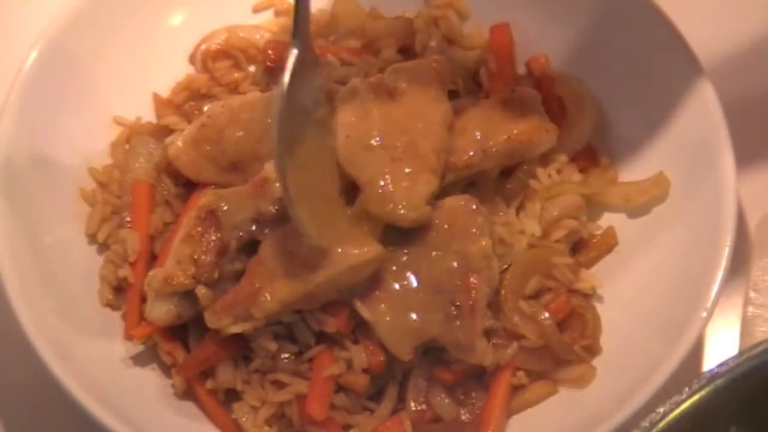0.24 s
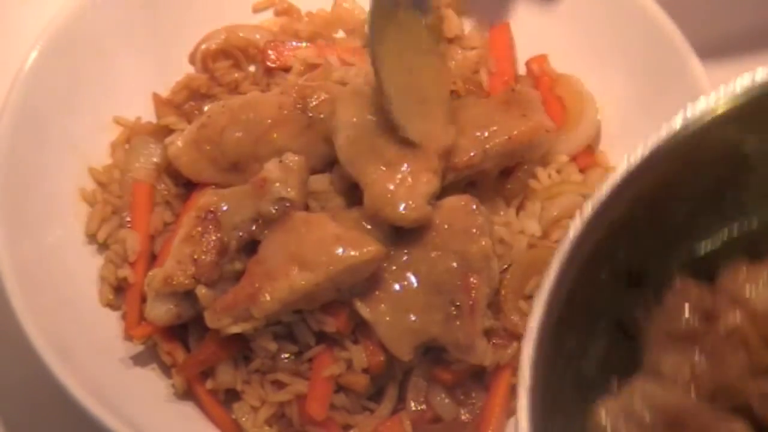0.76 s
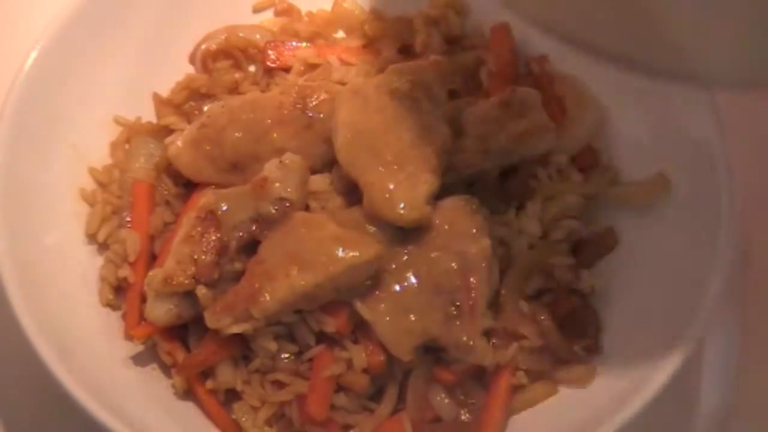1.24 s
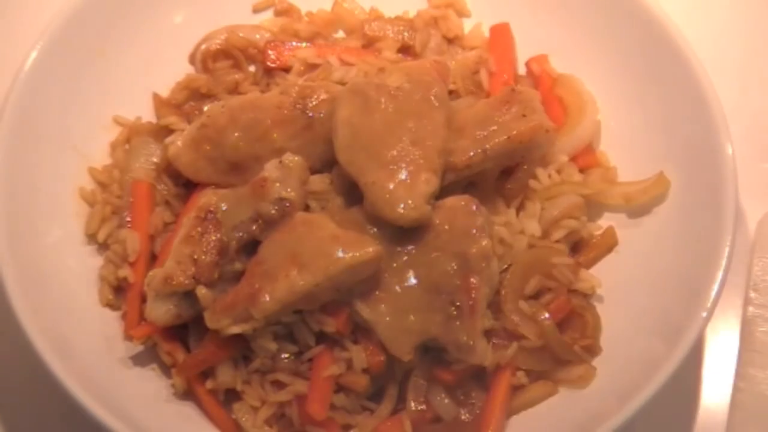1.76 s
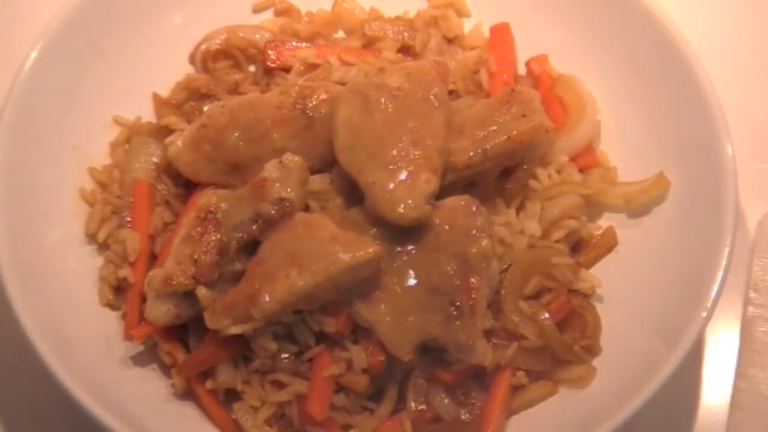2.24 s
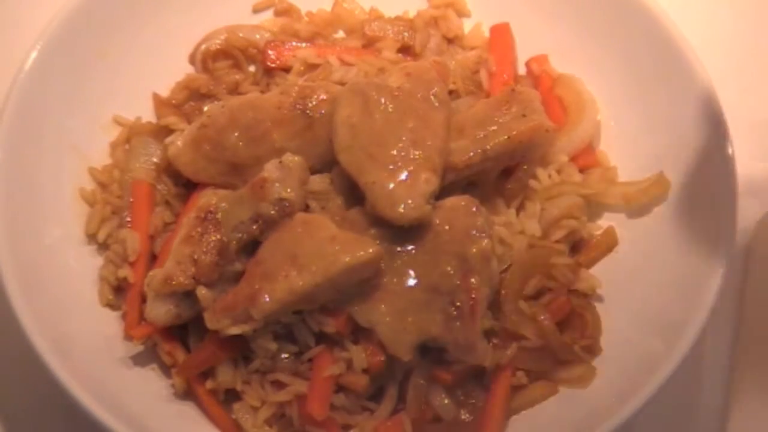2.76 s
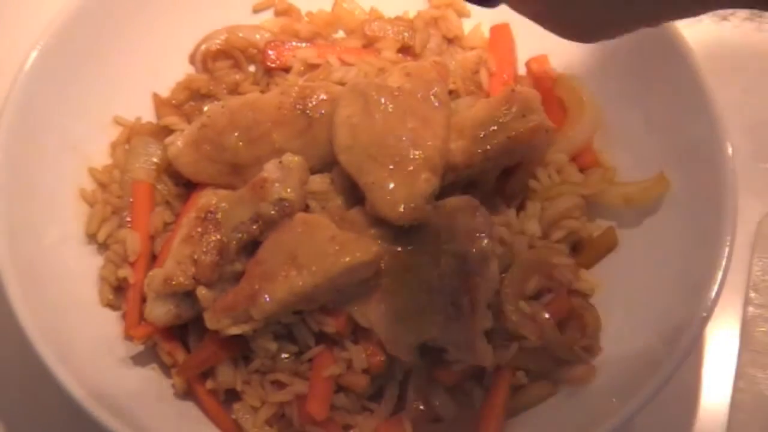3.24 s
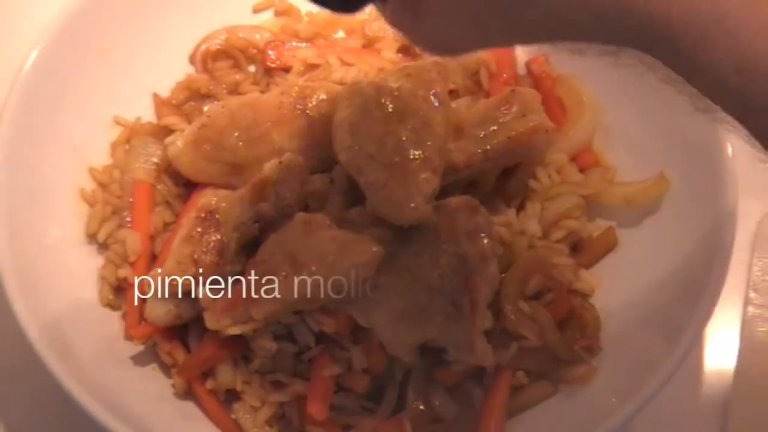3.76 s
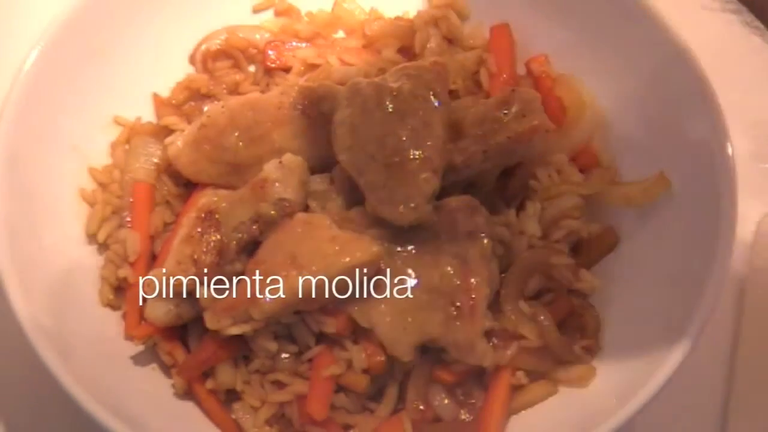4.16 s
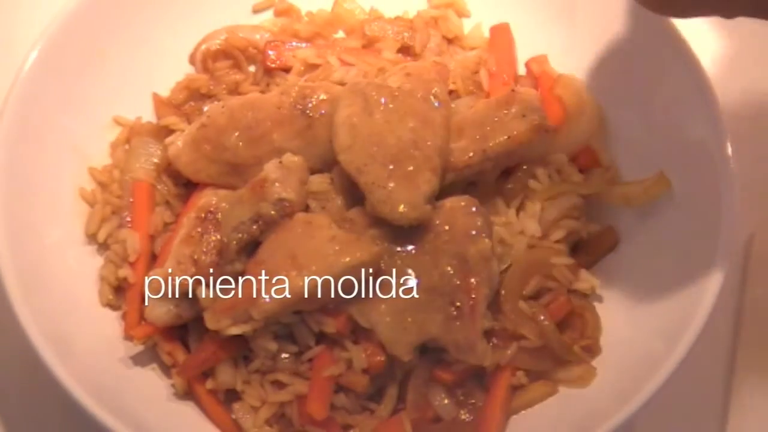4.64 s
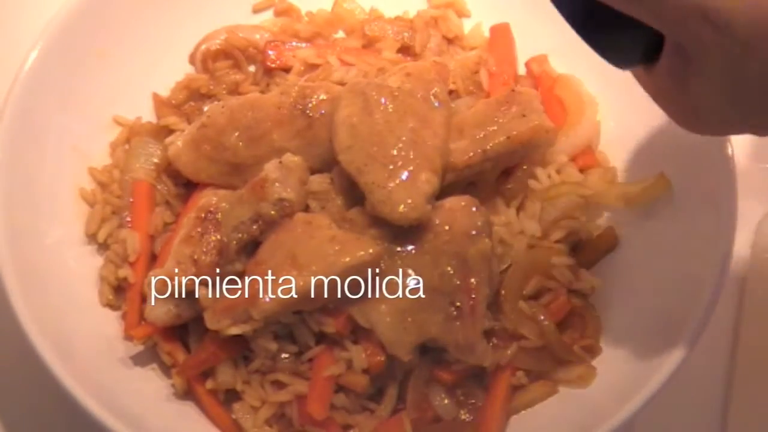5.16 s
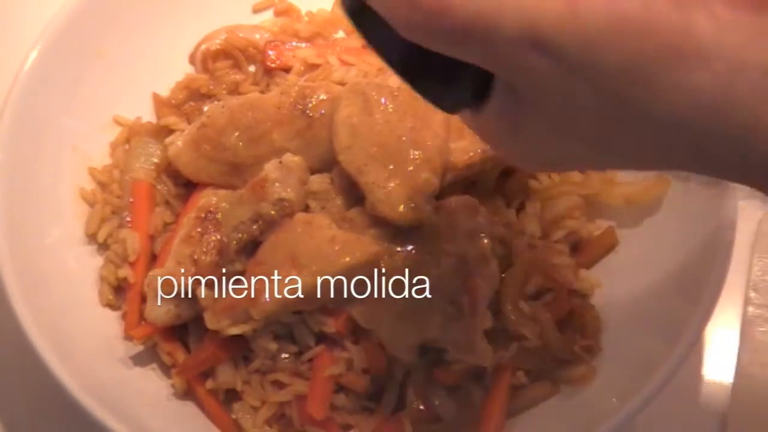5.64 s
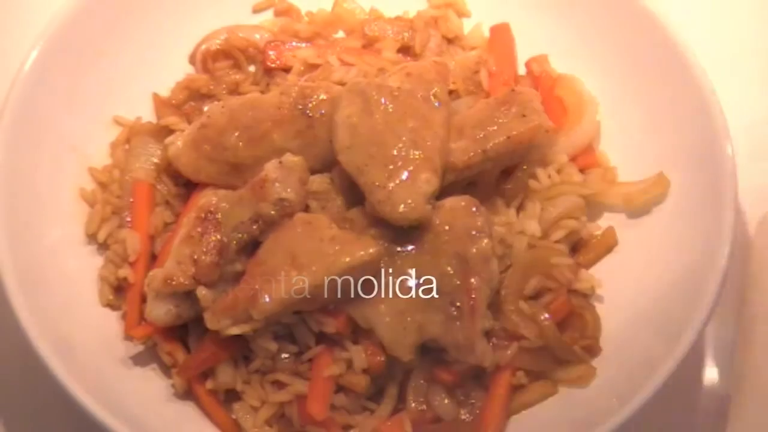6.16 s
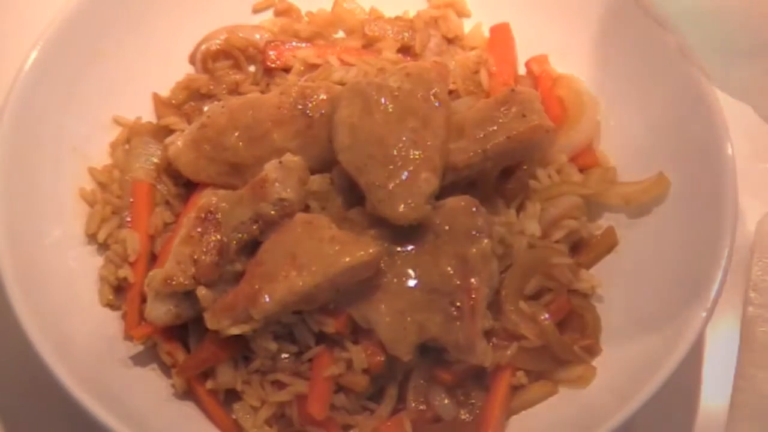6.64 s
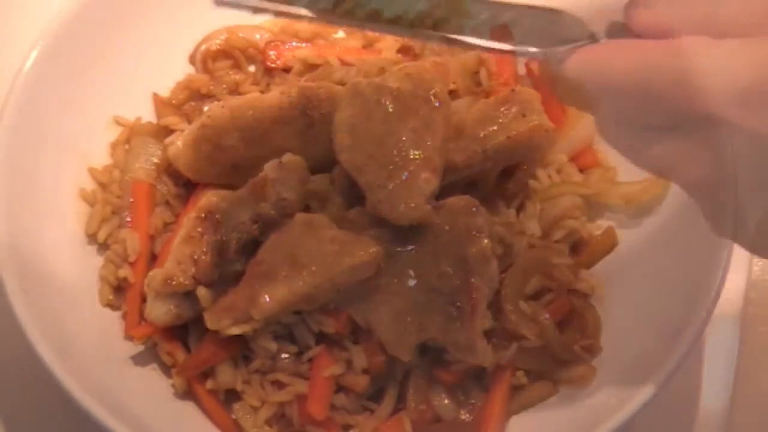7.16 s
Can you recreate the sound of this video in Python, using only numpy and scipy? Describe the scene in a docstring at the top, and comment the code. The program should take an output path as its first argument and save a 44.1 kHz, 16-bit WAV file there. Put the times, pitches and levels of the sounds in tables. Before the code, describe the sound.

A pan and lid knock sharply in a humming kitchen, a glass pepper mill grinds in short crunchy turns, and a metal grater rasps briefly.

```python
"""A glass pepper mill is twisted in short crunching turns: rough noise and single cracks ring its body,
while loose peppercorns tick on the glass jar as short rings of sliding pitch. Before that come a rustle
and the knocks of a cupboard, a pan, a lid and a spoon, each a push that clatters and rings; at the end,
short strokes on a steel grater, made of shaped rough noise. A hard-walled kitchen answers with fading
noise, and behind it all lie air noise and the wavering tones of appliances."""
import sys
import numpy as np
from scipy import signal
from scipy.fft import rfft, irfft, next_fast_len
from scipy.io import wavfile
from scipy.ndimage import uniform_filter1d, map_coordinates

SR = 44100
rng = np.random.default_rng(int(sys.argv[2]) if len(sys.argv) > 2 else 0)


def gain_from_decibels(decibels):
    """Convert decibel values to linear amplitude factors."""
    exponent = np.asarray(decibels, float) / 20
    return 10 ** exponent


def bounce(signal):
    """Save signal as a 16-bit WAV file at the path given by the first command-line argument."""
    frames = np.transpose(np.atleast_2d(signal))
    limited = np.clip(frames, -1, 1)
    pcm = np.round(limited * 32767).astype(np.int16)
    wavfile.write(sys.argv[1], SR, pcm)


N = 325899
T = np.arange(N) / SR  # time of each sample, in seconds

# How the background rises and falls: (time [s], change [dB])
BACKGROUND_SWELL = [(0, 0), (.9, 0), (1.55, -0.5), (1.92, 0.5), (2.4, 2), (3.3, 2.5), (6, 2.5), (6.5, 1.17),
                    (6.95, 0.4), (7.39, 2)]
# Colour of the air's low rush: (frequency [Hz], relative level [dB])
RUSH_COLOUR = [(25, -42), (60, -22), (90, -20), (170, -13), (240, -6), (295, -8), (330, 0), (700, -1),
               (880, -5), (1000, -2), (1650, -8), (2100, -16), (2700, -28), (3600, -50)]
# Colour of the air's hiss: (frequency [Hz], relative level [dB])
HISS_COLOUR = [(1500, -30), (2300, -2), (3000, 0), (5000, -2), (6300, -1), (8200, -3), (10000, -10),
               (14000, -17), (15200, -22), (16000, -40)]
# How alike the room noise is on the left and right: (frequency [Hz], likeness [-1 to 1])
ROOM_LIKENESS = [(60, -0.14), (180, 0.66), (550, -0.077), (1650, 0.4), (4970, 0.3), (15000, 0.07)]
# High appliance whine, before its drops: (frequency [Hz], level [dB])
WHINE_TONES = [(3752, -79), (4140, -89), (5701, -88), (6040, -89), (6433, -88), (7278, -90), (8037, -90)]
# Where the whine steps down: (time [s], loss [dB])
WHINE_DROPS = [(1.0, 3.5), (1.75, 11)]
# Low appliance drone: (frequency [Hz], relative level [dB])
DRONE_TONES = [(166.9, -91.5), (199.2, -76.5), (333.8, -73.5), (430.7, -76.5), (473.7, -71), (597.5, -86)]
# Motor tones that do not follow the swell: (frequency [Hz], level [dB])
MOTOR_TONES = [(60, -102.5), (101, -86), (334, -82), (1410, -79.5), (1637, -75)]

# How long the kitchen rings on: (frequency [Hz], time to fall 60 dB [s])
KITCHEN_DECAY = [(150, 0.66), (1000, 0.71), (4000, 0.47), (9000, 0.49), (15000, 0.19)]
# How alike the echoes are on the left and right: (frequency [Hz], likeness [-1 to 1])
ECHO_LIKENESS = [(120, 0.1), (300, 1), (1000, 0.91), (5000, 0.86), (9000, 0.072), (13000, 0.73)]

# The rustle, one row: (start [s], rise [s], level [dB], fall [dB per s])
SLEEVE = (.985, .04, -64, 110)
# Colour of the rustling cloth: (frequency [Hz], relative level [dB])
CLOTH_COLOUR = [(1500, -33), (2500, 3), (4000, 0), (8000, 2), (12000, -11), (15000, -25)]

# Contacts of objects: (time [s], clatter peak [dB], object [name], rise [s], chatter's 60 dB fall [s])
CONTACTS = [(1.463, -51, "cupboard", 0.0087, 0.11), (1.637, -25, "spoon", 0.00069, 0.059),
            (1.669, -33.5, "spoon", 0.0038, 0.044), (1.864, -54, "pan", 0.047, 0.13),
            (1.936, -4, "pan", 0.00044, 0.02), (1.945, -17, "pan", 0.0025, 0.019),
            (2.069, -13, "lid", 0.0012, 0.086), (2.08, -18, "lid", 0.0092, 0.05),
            (2.253, -35, "lid", 0.0059, 0.12), (2.558, -25, "mill", 0.0015, 0.063),
            (2.573, -30, "mill", 0.01, 0.068), (3.424, -10, "burr", 0.00031, 0.016),
            (3.472, -13.5, "burr", 0.00014, 0.011)]
# What each object rings with, by name: (frequency [Hz], width [Hz], relative level [dB])
OBJECT_RINGS = {"cupboard": [(210, 23, -8.5), (340, 60, -9)], "spoon": [(705, 30, -2), (1250, 30, -3),
                (1740, 40, -9), (2350, 40, -8), (3690, 60, -9), (4830, 20, 2), (5500, 20, -3),
                (6150, 30, -5), (6740, 35, -1), (7940, 45, -7), (8490, 45, -8),
                (9770, 30, -13)] , "pan": [(890, 30, -19), (1132, 13, 9.5), (1260, 17, -9.5),
                (1605, 16, 0.5), (1830, 23, 8.5), (2240, 78, -14.5), (2480, 11, -12.5), (3370, 170, 5.5),
                (3315, 15, -4), (3460, 30, -16), (5000, 23, -25.5), (5140, 34, -21), (6100, 120, -1),
                (7000, 21, -10.5)], "lid": [(875, 20, -8), (2014, 12, 4), (2930, 50, -4), (3025, 35, -2),
                (4775, 12, -7), (5356, 25, -6), (5490, 25, -8), (5770, 30, -9), (6375, 26, -5),
                (7058, 24, -1), (7434, 40, -8), (8115, 30, -7), (8430, 40, -10),
                (9300, 50, -15)] , "mill": [(1384, 44, -2), (2200, 43, -4), (3340, 120, -7), (3700, 34, -2),
                (4580, 32, -25), (5680, 57, -1), (7130, 32, 3), (8000, 23, -15), (8100, 48, -5),
                (11800, 110, -23)], "burr": [(895, 26, 5), (2550, 190, -2), (3140, 280, -1.5),
                (4500, 180, -11.5), (7300, 250, -11)]}
# Broad colour of each object's clatter, by name: (frequency [Hz], relative level [dB])
CLATTER_COLOUR = {"cupboard": [(60, -29), (200, 13), (600, -8), (3300, -17), (6000, -54)],
                  "spoon": [(180, -63), (300, -38), (701, -9), (1430, -3.5), (1560, -18), (6960, -6),
                  (13300, -19.5), (16000, -79)], "pan": [(71, -51), (120, -23), (341, -13.5), (630, -4),
                  (1290, -1.5), (1550, -5), (1830, 3.5), (2590, -15), (3310, 2), (3900, -11), (6630, -14.5),
                  (11500, -35.5), (16000, -51)], "lid": [(120, -52), (200, -39.5), (883, -2.5), (1650, -12),
                  (1940, 6.5), (3020, -9), (4040, -12.5), (7140, -3.5), (16000, -28)], "mill": [(120, -46),
                  (200, -15.5), (968, -4), (1870, -10), (2130, -3.5), (4040, -11.5), (8270, -2),
                  (13100, -28), (16000, -13)], "burr": [(88, -56), (150, -17), (1020, -4.5), (1690, -5),
                  (4490, 0), (4860, -3.5), (7770, -4.5), (8230, -12), (16000, -24.5)]}
# Peak of each object's ring against its clatter, by name: level [dB]
RING_OVER_CLATTER = {"cupboard": -6, "spoon": -5.5, "pan": -8, "lid": -5.5, "mill": -4, "burr": -6.5}
# The worktop's jolt under the pan, one row: (time [s], peak [dB], length [s])
WORKTOP_JOLT = (1.9365, -44, 0.009)

# Grater strokes: (start [s], length [s], plate level [dB], teeth level [dB])
GRATER_STROKES = [(7.027, 0.003, -29, -48.5), (7.083, 0.074, -53, -42), (7.177, 0.029, -31.5, -42)]
# Colour of the shaking plate: (frequency [Hz], relative level [dB])
PLATE_COLOUR = [(60, -70), (130, -21.5), (330, -0.5), (510, -7), (700, -1), (1220, -2.5), (1370, 0),
                (1800, -6), (2300, -9.5), (3300, -21.5), (4500, -41), (7000, -70)]
# Colour of the hissing teeth: (frequency [Hz], relative level [dB])
TEETH_COLOUR = [(900, -55), (2200, 7.5), (3100, 2.5), (3450, 6.5), (5000, -0.5), (8200, 1), (11000, -11.5),
                (14000, -15), (16000, -47)]

# Spells of corns tumbling: (start [s], length [s], rattle level [dB], upper ring against it [dB])
TUMBLES = [(2.387, 0.15, -67.5, -8), (2.56, 0.27, -63.5, -7), (3.003, 0.11, -51, -1),
           (3.217, 0.041, -62.5, -22), (3.455, 0.14, -51.5, -6), (3.817, 0.21, -52.5, -7),
           (4.12, 0.16, -50.5, -5), (4.391, 0.26, -53, -2), (4.826, 0.15, -48, -1.5),
           (5.15, 0.14, -48.5, -1.5), (5.407, 0.26, -51, -5.5), (5.735, 0.2, -52.5, -2.5),
           (6.284, 0.01, -42, -20), (6.35, 0.12, -67.5, 4)]
# The loudest single corns on the glass: (time [s], strength [dB], upper ring against it [dB])
LOUD_TICKS = [(2.5599, -37, 4), (3.0093, -47, 8), (3.2567, -32, -0.5), (3.4236, -21, -12), (3.5406, -38, 3),
              (3.6272, -31, 8), (4.084, -46, 2), (4.2116, -47, 6), (4.2819, -28, 1), (4.4176, -44, 3),
              (4.4825, -41, 13), (4.732, -48, 8), (4.9946, -54, 15), (5.1939, -46, 3), (5.2423, -29, -2),
              (5.4164, -50, 18), (5.4672, -43, -4), (5.6089, -25, 1), (5.6573, -41, 6), (5.7376, -33, -2),
              (5.7855, -45, 5), (5.8617, -26, -7), (5.927, -49, 16), (6.2943, -26.5, -27),
              (6.317, -27, -22), (6.335, -31, -15), (6.3977, -32.5, -1)]

# Turns of the mill: (start [s], climb [s], level [dB], cap resonance [Hz], low thud against it [dB])
MILL_TURNS = [(2.953, 0.027, -41, 2400, -24), (3.04, 0.022, -45.5, 2370, -9.5),
              (3.402, 0.03, -32.5, 2350, -7.5), (3.468, .008, -42, 2400, 0.5),
              (3.773, 0.038, -32, 2460, -10.5), (4.122, 0.037, -31, 2610, -15),
              (4.453, 0.045, -32, 2470, -15.5), (4.803, 0.038, -30, 2380, -17),
              (5.13, 0.045, -32, 2500, -15.5), (5.455, 0.034, -33.5, 2420, -15),
              (5.754, 0.035, -35.5, 2570, -10.5), (6.03, 0.077, -51.5, 2350, -8),
              (6.64, 0.03, -60, 3160, 2), (6.71, 0.0096, -59, 3170, -19)]
# Colour of the crushing noise: (frequency [Hz], relative level [dB])
CRUSH_COLOUR = [(400, -19), (900, -17), (1600, -0.5), (2500, 2.5), (5000, -7), (8000, -12.5),
                (10000, -13.5), (14000, -23.5), (16000, -43)]
# Peppercorns that split: (time [s], peak [dB], colour [Hz])
CORN_CRACKS = [(2.968, -29, 4500), (3.059, -28, 3150), (3.7839, -31, 2120), (3.8134, -23, 2750),
               (3.8228, -19, 2700), (4.135, -25, 2650), (4.1589, -18, 3100), (4.461, -26.5, 4870),
               (4.4695, -26, 4720), (4.4873, -24, 2380), (4.807, -34, 7000), (4.817, -27, 2240),
               (4.8369, -24.5, 2370), (4.8614, -41, 2270), (5.1403, -28, 4360), (5.1727, -30, 2500),
               (5.1775, -27, 2340), (5.194, -12, 4350), (5.2007, -17, 4350), (5.4635, -26, 4410),
               (5.7697, -31.5, 2750), (5.7874, -34, 2700), (5.9963, -40, 6400), (6.7374, -48, 4700)]


def unit(x):
    """Scale a sound to an average (rms) strength of 1."""
    return x / np.sqrt(np.mean(x ** 2) + 1e-20)


def peak_one(x):
    """Scale a sound to a peak of 1."""
    return x / np.abs(x).max()


def along(points, hz):
    """Read a value between (frequency, value) points, on a log frequency axis."""
    f, v = np.transpose(points)
    return np.interp(np.log(hz + 1), np.log(f + 1), v)


def wobble(rate):
    """A smooth random curve that bends about rate times a second."""
    return map_coordinates(rng.standard_normal(int(N * rate / SR) + 4), [T * rate])


def filtered(x, response):
    """Pass a sound through a response, given as a function of frequency."""
    m = next_fast_len(x.shape[-1] + 8192)
    return irfft(rfft(x, m) * response(np.fft.rfftfreq(m, 1 / SR)), m)[..., :x.shape[-1]]


def coloured(x, points):
    """Filter a sound by a table of (frequency, level)."""
    return filtered(x, lambda f: gain_from_decibels(along(points, f)))


def peaks(modes):
    """Response of (Hz, width Hz, dB) resonances; neighbours have opposite signs."""
    def response(f):
        total = 0
        for k, (centre, width, db) in enumerate(modes):
            drag = 1j * f * width
            total = total + (-1) ** k * gain_from_decibels(db) * drag / (centre * centre - f * f + drag)
        return total
    return response


def causal(points):
    """Minimum-phase response of a colour table: nothing sounds before the blow."""
    def response(f):
        ceps = irfft(np.log(gain_from_decibels(along(points, f)) + 1e-6))
        ceps[1:len(f) - 1] *= 2  # fold the half before time zero onto the half after it
        ceps[len(f):] = 0
        return np.exp(rfft(ceps))
    return response


def pair(z, hz, alike):
    """Mix two unrelated spectra into a left and right of a given likeness."""
    turn = np.arccos(np.clip(along(alike, hz), -1, 1))[:, None] / 2
    shared, opposite = np.cos(turn) * z[0], np.sin(turn) * z[1]
    return np.array([shared + opposite, shared - opposite])


def grit(rate, spread_db, smooth):
    """Rough noise: about rate random clicks a second, of uneven size, over smooth noise; rms 1."""
    hit = rng.random(N) < rate / SR
    unevenness = gain_from_decibels(spread_db * np.minimum(rng.exponential(size=N), 2.5))
    size = unevenness * rng.standard_normal(N)
    return unit(unit(hit * size) + smooth * rng.standard_normal(N))


def burst(rise_s, length_s):
    """A crack of noise that rises quickly, then falls 60 dB in length_s."""
    t = np.arange(SR // 3) / SR
    return (1 - np.exp(-t / rise_s)) * gain_from_decibels(-60 * t / length_s) * rng.standard_normal(len(t))


def swell(s, rise_s, hold_s, climb_db, fall_db_per_s):
    """Gain that opens over rise_s, moves from climb_db to 0 dB through hold_s, then dies away."""
    top = s + rise_s + hold_s
    level_db = np.interp(T, [s + rise_s, top], [climb_db, 0]) - fall_db_per_s * np.maximum(T - top, 0)
    return np.clip((T - s) / rise_s, 0, 1) ** 2 * gain_from_decibels(level_db)


def add(line, s, sound):
    """Lay a sound on the line at time s."""
    part = line[round(s * SR):][:len(sound)]
    part += sound[:len(part)]


def appliance_tones(lines, drift):
    """Sines whose loudness and phase waver slowly, as from an unsteady appliance."""
    total = 0
    for hz, db in lines:
        loudness = np.sqrt(2) * gain_from_decibels(db + 1.4 * wobble(7.3))
        total = total + loudness * np.sin(2 * np.pi * hz * T + drift * wobble(6))
    return total


def room_tone():
    """Ventilation makes a slightly patchy rush and hiss; appliances add thin, unsteady tones."""
    rush_db, hiss_db, drone_db = -57.5, -67.5, -6.5  # where the swell is 0 dB
    hiss_grows, drone_grows = 2.86, 3.1  # dB for each dB of swell
    whine_step_s = 0.06
    swell_db = np.interp(T, *np.transpose(BACKGROUND_SWELL))
    whine_db = -sum(loss / (1 + np.exp((s - T) / whine_step_s)) for s, loss in WHINE_DROPS)

    hz, _, z = signal.stft(rng.standard_normal((2, N)), SR, nperseg=512)
    # smooth the patches over frequency, then over time
    patches = uniform_filter1d(uniform_filter1d(rng.standard_normal(z.shape[1:]), 5, 0), 12, 1)
    patchy = pair(z, hz, ROOM_LIKENESS) * gain_from_decibels(0.84 * unit(patches))
    noise = signal.istft(patchy, SR, nperseg=512)[1][:, :N]
    rush = gain_from_decibels(rush_db + swell_db) * unit(coloured(noise, RUSH_COLOUR))
    hiss = gain_from_decibels(hiss_db + hiss_grows * swell_db) * unit(coloured(noise, HISS_COLOUR))

    whine = gain_from_decibels(whine_db) * appliance_tones(WHINE_TONES, drift=0.67)
    drone = gain_from_decibels(drone_db + drone_grows * swell_db) * appliance_tones(DRONE_TONES, drift=0.99)
    motor = appliance_tones(MOTOR_TONES, drift=0.92)
    return rush + hiss + whine + drone + motor


def kitchen(x):
    """Hard walls answer with fading noise; each frequency dies at its own speed."""
    delay_s = 0.004
    out, hop = np.zeros((2, N + SR)), SR // 3
    for start in range(0, N, hop):  # a fresh tail for each third of a second
        hz, t, z = signal.stft(rng.standard_normal((2, SR * 3 // 4)), SR, nperseg=256)
        z = pair(z, hz, ECHO_LIKENESS) * gain_from_decibels(-60 * t / along(KITCHEN_DECAY, hz)[:, None])
        tail = signal.istft(z, SR, nperseg=256)[1]
        tail = tail / np.linalg.norm(tail[0])
        wet = signal.fftconvolve(x[None, start:start + hop], tail, axes=1)
        for side in (0, 1):
            add(out[side], start / SR + delay_s, wet[side])
    return out[:, :N]


def rustle():
    """A sleeve brushes past: rough noise in the colour of cloth."""
    s, rise_s, db, fall_db_per_s = SLEEVE
    brush = coloured(grit(3000, spread_db=4.0, smooth=0.93), CLOTH_COLOUR)
    return gain_from_decibels(db) * swell(s, rise_s, 0.001, 0, fall_db_per_s) * unit(brush)


def knocks():
    """Each contact is a push and a brief chatter: a broad clatter, and a ring mostly from the push."""
    out = np.zeros(N)
    for s, db, thing, rise_s, chatter_s in CONTACTS:
        force = burst(rise_s, chatter_s)
        force[0] = 0.0011 / rise_s  # the quicker the contact, the sharper its first push
        strike = 0.31 * force
        strike[0] = 0.0018 / rise_s + 1
        clatter = peak_one(filtered(force, causal(CLATTER_COLOUR[thing])))
        ring = peak_one(filtered(strike, peaks(OBJECT_RINGS[thing])))
        add(out, s, gain_from_decibels(db) * (clatter + gain_from_decibels(RING_OVER_CLATTER[thing]) * ring))
    # the pan's weight jolts the worktop under the camera
    s, db, length_s = WORKTOP_JOLT
    add(out, s, gain_from_decibels(db) * np.hanning(round(length_s * SR)))
    return out


def grater():
    """Peel catching on rows of teeth shakes the plate and hisses."""
    rise_s, climb_db_per_s, fall_db_per_s = 0.0069, 153, 239
    plate_gain, teeth_gain = np.zeros(N), np.zeros(N)
    for s, length_s, plate_db, teeth_db in GRATER_STROKES:
        stroke = swell(s, rise_s, length_s, -climb_db_per_s * length_s, fall_db_per_s)
        plate_gain += gain_from_decibels(plate_db) * stroke
        teeth_gain += gain_from_decibels(teeth_db) * stroke
    plate = unit(coloured(grit(1200, spread_db=-1.0, smooth=0.98), PLATE_COLOUR))
    teeth = unit(coloured(grit(3600, spread_db=-5.5, smooth=1.0), TEETH_COLOUR))
    return plate_gain * plate + teeth_gain * teeth


def gliding_ring(hz, t60, soft, hard):
    """A ring of moving pitch: shift the drive down, let it decay in one pole, shift it back up."""
    carrier = np.exp(2j * np.pi * np.cumsum(hz) / SR)
    pole = gain_from_decibels(-60 / (t60 * SR))
    drive = (np.sqrt(1 - pole ** 2) * soft + 0.33 * hard) / carrier
    return (carrier * signal.lfilter([1], [1, -pole], drive)).imag


def jar():
    """Corns tumbling on glass set off short rings, in left and right."""
    rise_s, fall_db_per_s, uneven_db = 0.026, 161, 2.5
    jar_hz, sag_hz, recover_s = 8930, 150, 0.076  # the grip pulls the pitch flat, then lets go
    stray_db, strays_per_s = 6, 14  # stray corns, over the rattle
    low, high, last_start = np.zeros(N), np.zeros(N), np.zeros(N)
    for s, length_s, db, high_db in TUMBLES:
        tumble = gain_from_decibels(db) * swell(s, rise_s, length_s, 0, fall_db_per_s)
        low += tumble
        high += gain_from_decibels(high_db) * tumble
        last_start = np.maximum(last_start, np.where(T >= s, s, 0))
    low *= gain_from_decibels(uneven_db * wobble(25))
    high *= gain_from_decibels(uneven_db * wobble(25))
    hz = jar_hz - sag_hz * np.exp(-(T - last_start) / recover_s) + 15 * wobble(20)

    patter = np.array([grit(500, spread_db=2.0, smooth=0.32), grit(500, spread_db=10.0, smooth=0.85)])
    taps = low * patter
    stray = gain_from_decibels(stray_db) * (rng.random(N) < strays_per_s / SR) * rng.standard_normal(N)
    single, upper = low * stray, 4.54 * high * stray
    for s, db, high_db in LOUD_TICKS:
        add(single, s, [gain_from_decibels(db)])
        add(upper, s, [gain_from_decibels(db + high_db)])

    out = filtered(0.89 * single + 0.113 * taps, peaks([(10500, 7100, 0)]))  # the bare patter
    # the lowest ring is a close pair that spreads two ways
    # (pitch ratio, time to fall 60 dB [s], dense taps, single taps, left over right [dB])
    rings = [(0.99, 0.035, taps[0], single, -5.5),
             (1.011, 0.012, taps[1], 0.12 * single, -3),
             (1.338, 0.03, patter[0] * high, upper, 3)]
    for ratio, t60, soft, hard, pan_db in rings:
        out += gliding_ring(ratio * hz, t60, soft, hard) * gain_from_decibels([[pan_db / 2], [-pan_db / 2]])
    return out


def mill_turns():
    """The burr crushes corns: dense grit rings the cap, neck and burr, with a thud from the base."""
    bite_s, bite_db = 0.0092, -11.5  # the burr catches at once, this far under full level, then climbs
    slack_db_per_s = 297  # a quick fall, then a slower trickle of crumbs:
    settle_db, settle_db_per_s = -18.5, 91
    firm_db, cap_db, cap_grows = -25.5, 0.5, 1  # turns under firm_db ring the cap less, dB per dB
    neck_hz, regrip = 4450, 0.025  # each grip shifts the neck resonance by about this share
    judder_db = 0.5  # teeth slip unevenly
    base, hollow = peaks([(1046, 600, 0)]), peaks([(905, 70, 6)])  # the mill's hollow base

    crush = coloured(gain_from_decibels(judder_db * wobble(140)) * grit(3000, spread_db=4, smooth=1.0), CRUSH_COLOUR)
    thud = unit(filtered(grit(900, spread_db=-4.5, smooth=0.1), lambda f: base(f) ** 2 * (1 + hollow(f))))
    out = np.zeros(N)
    for s, climb_s, db, cap_hz, low_db in MILL_TURNS:
        twist = swell(s, bite_s, climb_s - bite_s / 2, bite_db, slack_db_per_s)
        crumbs = gain_from_decibels(settle_db) * swell(s, climb_s, 0.00083, 0, settle_db_per_s)
        effort = twist + crumbs
        span = slice(round(s * SR), round(s * SR) + SR // 2)
        cap = (cap_hz, 260, cap_db + cap_grows * min(db - firm_db, 0))
        neck = (neck_hz * (1 + regrip * rng.standard_normal()), 213, 4.3)
        burr = (7130, 1180, 0.5)
        body = peaks([cap, neck, burr])
        rung = filtered(crush[span], lambda f: body(f) + 0.34)  # some grit is heard directly
        out[span] += gain_from_decibels(db) * effort[span] * (unit(rung) + gain_from_decibels(low_db) * thud[span])
    return out


def corn_cracks():
    """Single corns split: very short cracks of noise, each with its own colour."""
    out = np.zeros(N)
    air = peaks([(4000, 9000, 0)])
    for s, db, hz in CORN_CRACKS:
        body = peaks([(hz, 0.4 * hz, 0), (7000, 3500, -7)])
        split = filtered(burst(0.00021, 0.0092), lambda f: body(f) * air(f))
        add(out, s, gain_from_decibels(db) * peak_one(split))
    return out


def mill():
    """The pepper mill: crunching turns and the corns that split in the burr."""
    return mill_turns() + corn_cracks()


def thin(x):
    """A gentle cut of the bass below the corner."""
    corner_hz = 129
    return filtered(x, lambda f: (1j * f / (corner_hz + 1j * f)) ** 2)


def scene():
    """Sources sit close to the middle; the worktop is farther off and so more echoing."""
    far, near, glass = knocks(), thin(mill() + rustle() + grater()), thin(jar())
    to_walls = gain_from_decibels(-5) * far + gain_from_decibels(-7.5) * near + gain_from_decibels(-5.0) * glass.mean(0)
    wet = thin(kitchen(to_walls))
    balance = gain_from_decibels([[-0.2], [0.2]])  # left, right
    return (far + near) * balance + glass + wet + room_tone()


def low_pass(x):
    """Removes everything above the highest recorded frequency."""
    return signal.sosfilt(signal.butter(12, 16480, fs=SR, output="sos"), x)


def record(dry):
    """The camera's input flattens the loudest peaks, then cuts off the highest treble."""
    ceiling, top_hz = 0.55, 15800
    soft = dry / (1 + np.abs(dry / ceiling) ** 4) ** (1 / 4)
    mix = filtered(soft, lambda f: 1 / (1 + (f / top_hz) ** 40))
    return low_pass(mix)


dry = scene()
out = record(dry)
bounce(out)
```